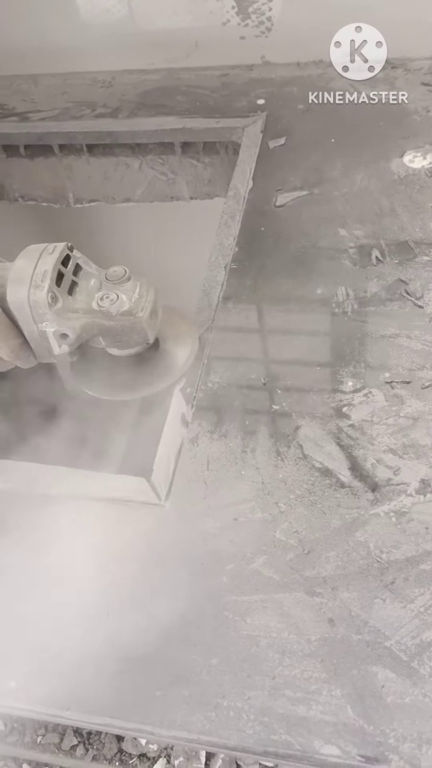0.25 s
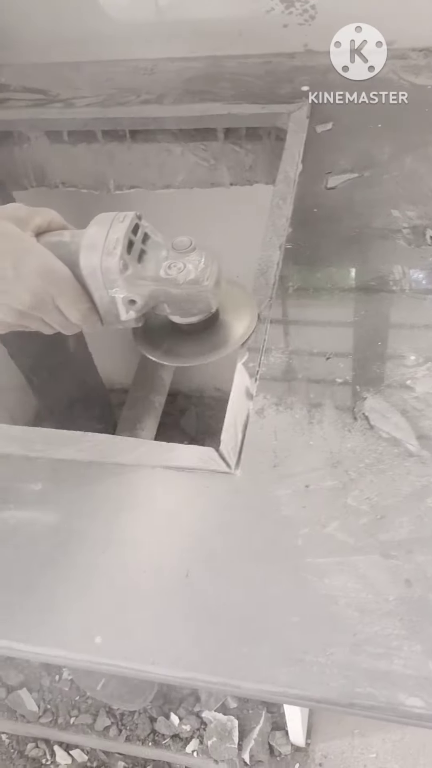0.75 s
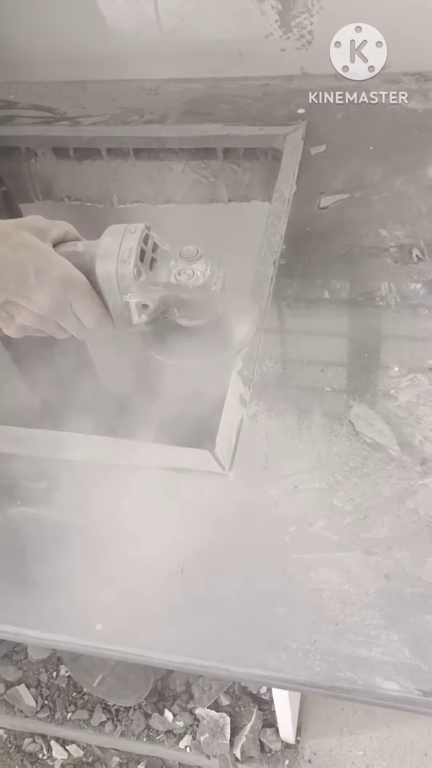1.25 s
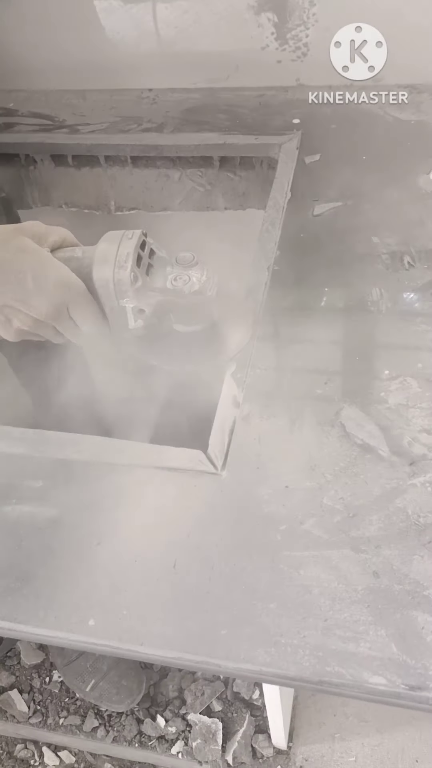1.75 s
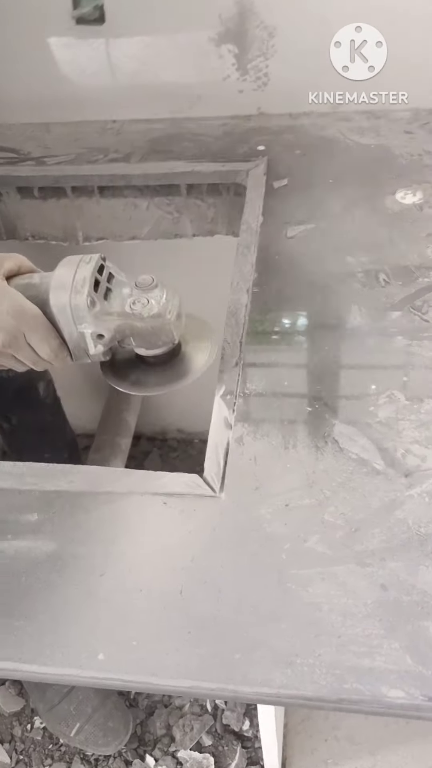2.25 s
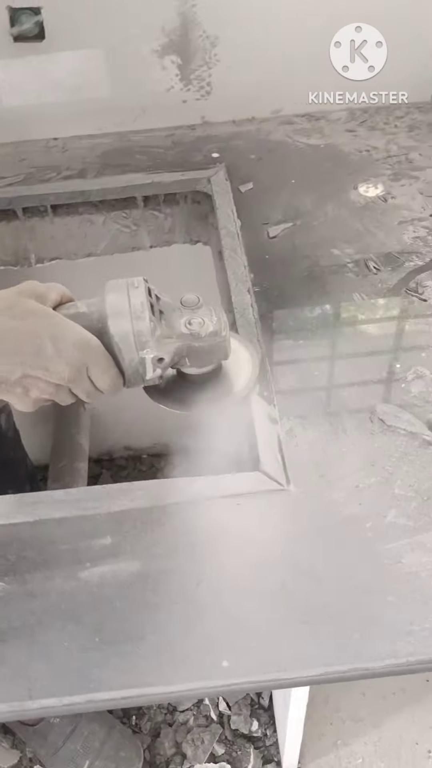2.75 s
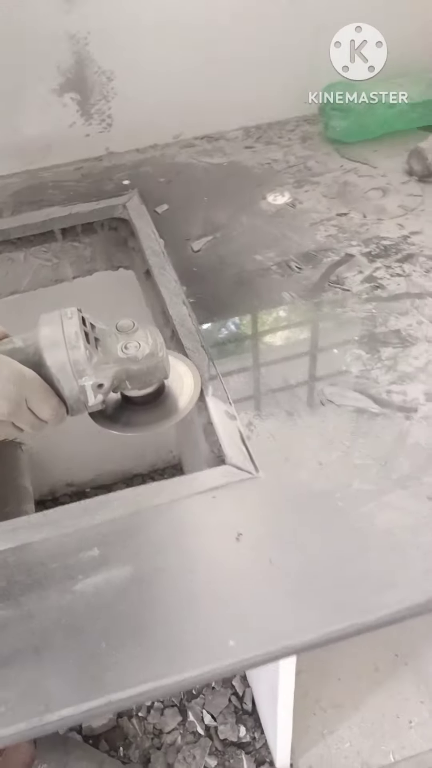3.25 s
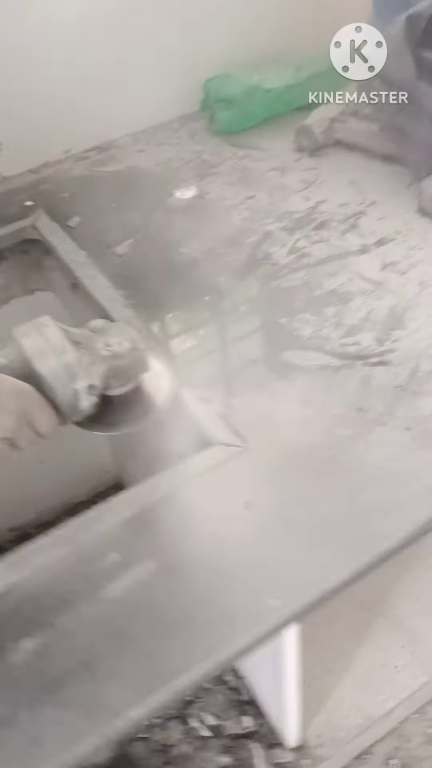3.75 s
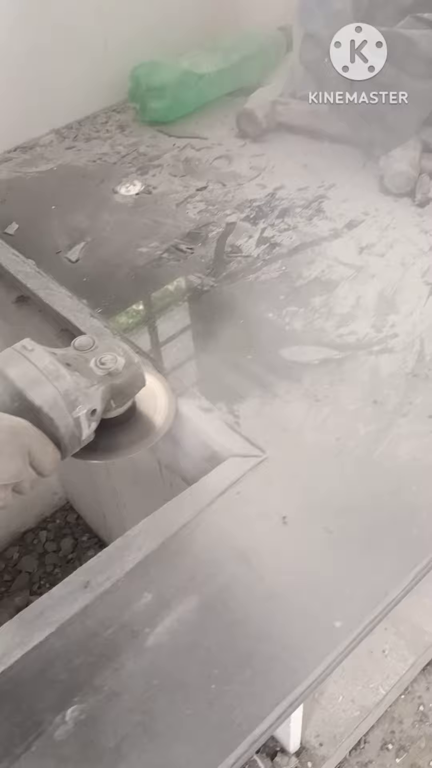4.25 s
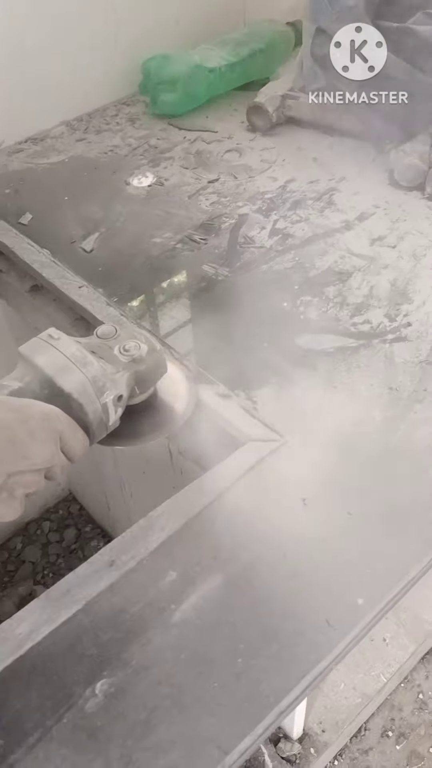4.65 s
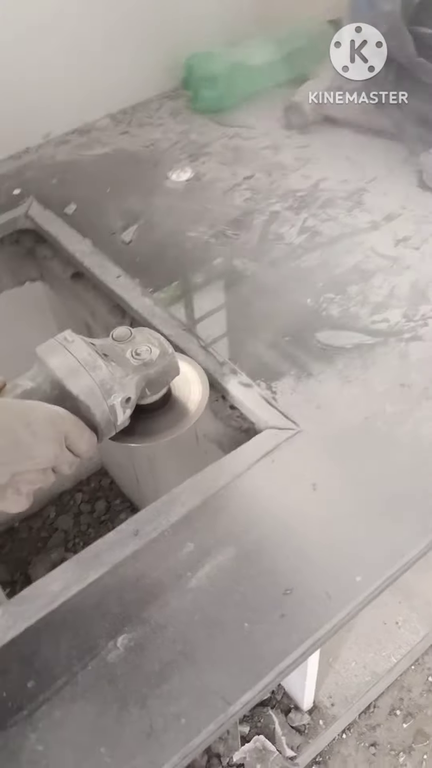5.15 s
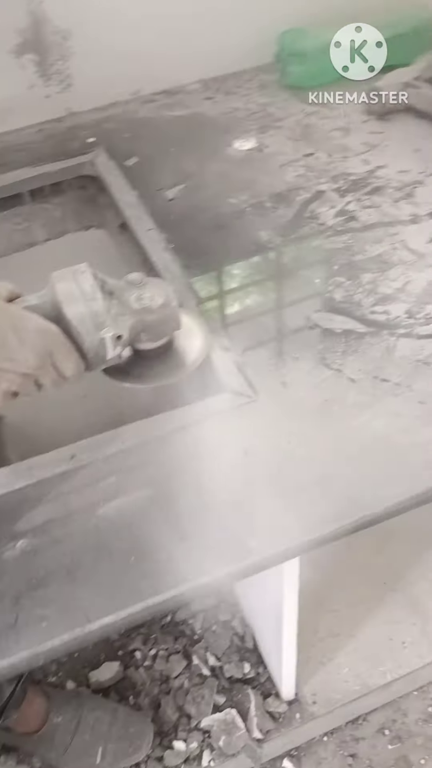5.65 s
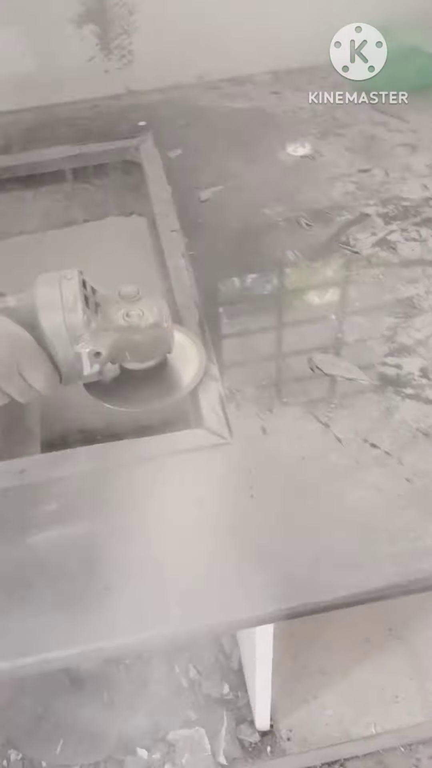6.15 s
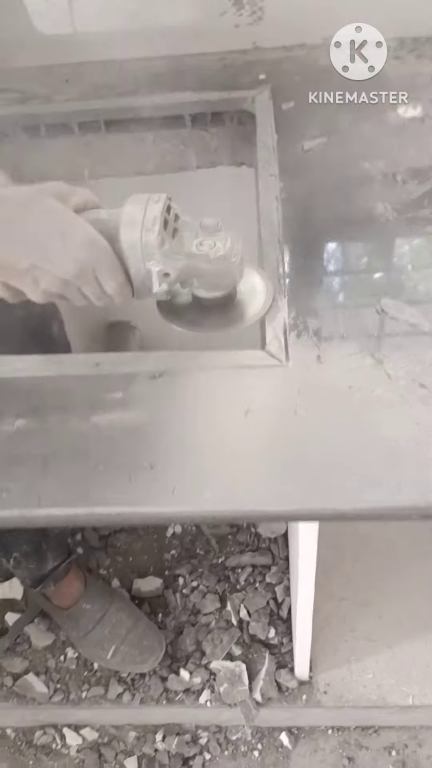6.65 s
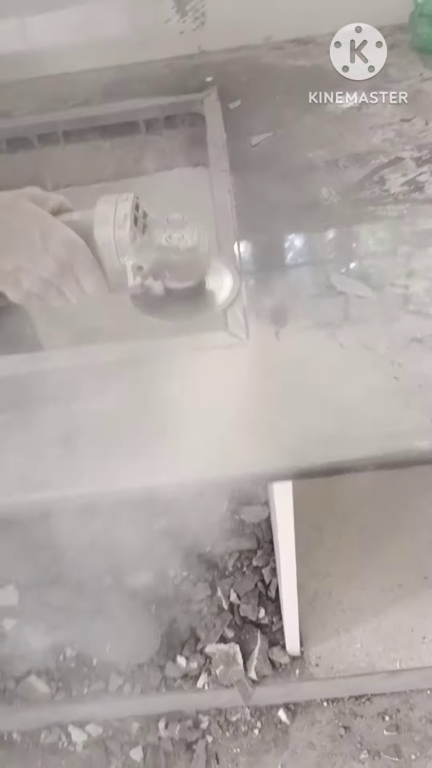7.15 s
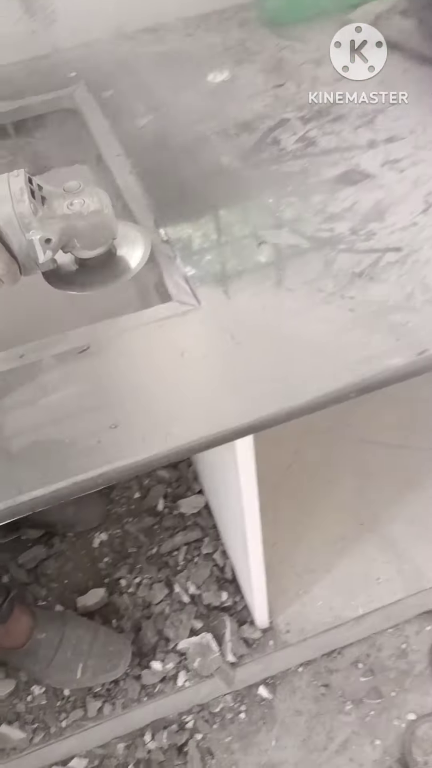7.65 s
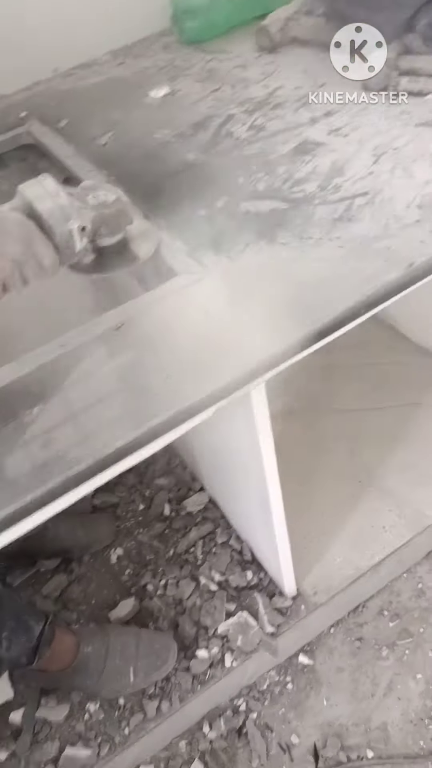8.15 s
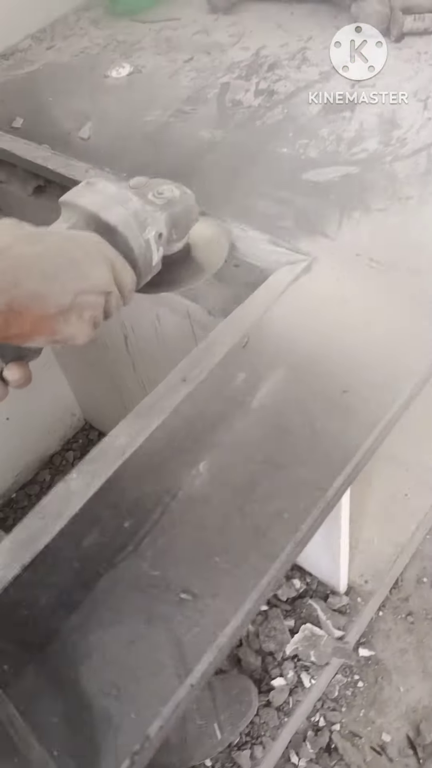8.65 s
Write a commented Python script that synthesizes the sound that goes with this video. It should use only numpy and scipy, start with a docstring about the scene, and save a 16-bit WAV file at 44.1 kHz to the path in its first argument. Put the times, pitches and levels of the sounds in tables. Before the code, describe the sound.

In a bare room, a steel grinding disc rasps and rings against stone in seven close passes of uneven length. Each time the angle grinder lifts, the grinding briefly stops and its hissing motor spins up, only to drop in pitch at the next touch. A low rush of air hits the nearby microphone during the passes, pushing the overall level down.

```python
"""First comes the rasp of grit and a ringing steel disc: an angle grinder is already on the stone.
It dresses a countertop edge in seven passes, in a bare room, close to a stereo microphone.
Under load the rotor slows; lifted, it spins up, whining while its fan hisses. The dusty draught
off the cut buffets the microphone, whose gain control ducks and recovers."""
import sys
import numpy as np
from scipy import signal
from scipy.fft import rfft, irfft, next_fast_len
from scipy.io import wavfile
from scipy.ndimage import uniform_filter1d

SR = 44100
rng = np.random.default_rng(int(sys.argv[2]) if len(sys.argv) > 2 else 0)


def pcm_store(signal):
    """Save signal as 16-bit PCM."""
    levels = np.round(np.clip(np.atleast_2d(signal), -1, 1) * 32767)
    wavfile.write(sys.argv[1], SR, levels.astype(np.int16).T)


N = 392490
TIME = np.arange(N) / SR


# Grit on the stone edge, heard close: (frequency [Hz], relative level [dB])
RASP_SPECTRUM = [(200, -11.5), (700, 3), (1200, 1.5), (2400, -1), (3700, 3.5), (5200, 1), (6000, 1),
                 (7500, -2), (9500, -7), (12400, -9.5), (13600, -0.5), (14200, -7), (14600, -12),
                 (15400, -2)]
# Its place across the microphone: (frequency [Hz], left minus right [dB])
RASP_BALANCE = [(500, 8.5), (1300, -0.5), (2400, -4), (4000, -3), (7000, -4.5), (9300, -15), (11000, -4.5),
                (12500, -17.5), (14000, 14.5), (15000, -14.5)]

def stone_rasp(turns):
    """Grains breaking off the stone rasp louder the harder the hand presses."""
    grains = grit(turns, grains_per_s=26000, spread_db=2.0, wobble=0.025, flutter_db=0.64)
    force = pressure(press_share=0.88, landing_db=-20, settle_s=0.016)
    return amp(-25.0) * colour(grains, RASP_SPECTRUM, RASP_BALANCE) * force


# Modes of the steel disc, at the microphone:
# (frequency [Hz], width [Hz], level [dB], left minus right [dB], swell per unit of freshness [dB])
DISC_MODES = [(4724, 180, -40.5, -1, -5), (5056, 170, -44.5, 1, 3.5), (6620, 430, -40, 4, 1),
              (8334, 100, -47, 9, 2), (10350, 59, -51, -9, 3), (11610, 97, -42.5, -6, 3.5),
              (13020, 190, -42, -2, 8), (13200, 250, -50, 5, -2), (15500, 150, -49, 2, -5)]

def disc_ring(turns):
    """Grains set the disc ringing; each mode comes and goes as the contact point moves."""
    grains = grit(turns, grains_per_s=18000, spread_db=3.5, wobble=0.068, flutter_db=1.0)
    force = pressure(press_share=0.39, landing_db=-2, settle_s=0.012)
    drive = grains * np.maximum(force, amp(1.5) * lag(force, seconds=0.032))  # sings on after the lift
    # the lighter the disc lands, the more its ring changes at first
    freshness = sum(.72 * amp(-.8 * first_db) * (TIME > touch) * np.exp(-abs(TIME - touch) / 0.11)
                    for touch, *_, first_db, _ in PASSES)
    ring = 0
    for hz, width_hz, db, side_db, fresh_db in DISC_MODES:
        mode = signal.lfilter(*signal.iirpeak(hz, hz / width_hz, SR), drive)
        swell_db = fresh_db * freshness + wander(15.0)
        ring = ring + amp(db + swell_db) * pair(side_db)[:, None] * unit(mode)
    return ring


def grit(turns, grains_per_s, spread_db, wobble, flutter_db):
    """Countless grains break off, louder at the high spot of each turn of the disc."""
    sizes = amp(spread_db * np.minimum(rng.exponential(1, (2, N)), 4))
    grains = sizes * rng.standard_normal((2, N)) * (rng.random((2, N)) < grains_per_s / SR)
    disc_turns = .27 * turns  # geared down from the rotor
    return unit(grains) * (1 + wobble * np.cos(2 * np.pi * disc_turns)) * amp(flutter_db * wander(22))


# Passes along the countertop: (touch [s], lift [s], press of the hand [dB],
# swing of the vents towards the microphone [dB], firmness of first touch [dB], draught fade [s])
PASSES = [(-.6, .393, 0.37, 6.5, -9, 0.011), (.745, 2.133, 0, 4.5, -1.5, 0.011),
          (2.474, 2.967, -1.5, -2.5, -5.5, 0.009), (3.344, 5.13, .5, 5, -4.5, 0.16),
          (5.471, 6.354, 0, 2, -7.5, .01), (6.697, 7.439, -1.2, .3, -3, 0.011),
          (7.852, 8.679, -.5, 1.5, -4.5, .023)]

def pressure(press_share, landing_db, settle_s, bite_db=1.85, ease_s=0.018):
    """Force on the stone: the disc bites deeper through each pass and eases just before the lift."""
    force = 0
    for touch, lift, press_db, *_ in PASSES:
        press = amp(press_share * press_db + bite_db * (progress(touch, lift) - .5))
        release = np.clip((lift - TIME) / ease_s, 0, 1)
        force = force + press * lean(touch, landing_db, settle_s) * release
    return force


def lean(touch, landing_db, settle_s):
    """The disc touches lightly, then the hand leans in."""
    age = np.maximum(TIME - touch, 0)
    return np.minimum(age / 0.023, 1) * amp(landing_db * np.exp(-age / settle_s))


def rotor_speed(free_hz, sag_hz, inertia_s):
    """The rotor sags in step with the press and spins up again when the disc is lifted."""
    load = sum(amp(press_db) * (TIME > touch) * (TIME < lift) for touch, lift, press_db, *_ in PASSES)
    return lag(free_hz - sag_hz * load, inertia_s) * (1 + 0.0011 * wander(25))


# Hiss from the fan vents, heard close: (frequency [Hz], relative level [dB])
FAN_SPECTRUM = [(300, -46), (600, -20.5), (850, -8.5), (1200, -10), (1700, -6.5), (2500, -13), (3300, -2),
                (4100, 2.5), (5400, -3.5), (6700, -1.5), (8200, -3.5), (10500, 0), (13000, -5.8),
                (14200, -11.5), (15400, -14.5)]
# Its place across the microphone: (frequency [Hz], left minus right [dB])
FAN_BALANCE = [(60, 0.5), (99, 1.0), (160, 0.0), (270, 0.0), (450, 5), (740, -4.5), (1220, 0.5),
               (2010, 2.5), (3330, 3.5), (5500, 5), (9080, -4), (15000, -7)]

def fan_hiss(turns):
    """Air is chopped once a turn; on each pass the arm swings the vents to or from the microphone."""
    air = rng.standard_normal((2, N)) * (1 + .07 * np.cos(2 * np.pi * turns))
    arches_db = sum(swing_db * np.sin(np.pi * progress(touch, lift))
                    for touch, lift, _, swing_db, *_ in PASSES)
    return amp(-34.5 + lag(arches_db, seconds=0.14)) * colour(air, FAN_SPECTRUM, FAN_BALANCE)


# Whine at the microphone: (multiple of rotor speed [ratio], level at free speed [dB])
# .54 is twice the disc's turn, 24 the commutator
WHINE_TONES = [(.54, -68), (.66, -79), (1.46, -72), (2, -62), (3.33, -64), (4, -55.5), (4.88, -65),
               (8, -58), (8.7, -52), (10, -58), (24, -55)]
# Tones that sing out at the microphone as the tool is turned:
# (time [s], multiple of rotor speed [ratio], boost [dB], half length [s])
WHINE_FLARES = [(.66, 4, 5, .09), (.72, 8.7, 7, .04), (2.355, 8.7, 12, .045), (3.27, .66, 10, .08),
                (5.44, .66, 15, .05), (6.65, 2, 4, .06), (7.72, 2, 4, .12), (8.86, .66, 11, .06)]

def motor_whine(turns):
    """Rotor and gears sound tones locked to the speed; slack in gears and bearings shakes the phase."""
    whine = 0
    for multiple, db in WHINE_TONES:
        flare_db = sum(boost_db * np.exp(-((TIME - at) / half_s) ** 2)
                       for at, tone, boost_db, half_s in WHINE_FLARES if tone == multiple)
        slack = .25 * wander(45)
        offset = min(multiple / 2, 1) * rng.random((2, 1))  # low tones are more in step left and right
        wave = np.sqrt(2) * np.cos(2 * np.pi * (multiple * turns + offset) + slack)
        whine = whine + amp(db + flare_db + 2 * wander(16.0)) * wave
    return whine


# Draught right on the microphone, at full flow: (frequency [Hz], relative level [dB])
DRAUGHT_SPECTRUM = [(20, -39), (40, -5.5), (70, -2.5), (140, -1), (240, 2.5), (430, -2), (700, 0.5),
                    (900, -4.5), (1200, -13), (2000, -18), (5000, -43)]
# Place of draught and housing rush across the microphone: (frequency [Hz], left minus right [dB])
AIR_BALANCE = [(60, 3.5), (200, 3.5), (400, 2), (700, 0.1), (1300, -7.5)]

def draught(level_db, patchy_db, gust_db):
    """Dusty air off the cut hits each microphone port on its own; its eddies sink in pitch as it dies."""
    force, flow = np.zeros(N), np.zeros(N)
    for touch, lift, press_db, _, first_db, fade_s in PASSES:
        remaining = np.clip(1 - (TIME - lift) / fade_s, 0, 1) * (TIME > touch - .02)
        flow += remaining ** 3
        force += amp(0.31 * press_db) * lean(touch, first_db, settle_s=0.091) * np.sqrt(remaining)
    hz, frame_s, eddies = signal.stft(rng.standard_normal((2, N)), SR, nperseg=1024, noverlap=768)
    full_flow_hz = hz[:, None] / np.clip(np.interp(frame_s, TIME, flow), .35, 1)
    patches = uniform_filter1d(rng.standard_normal(eddies.shape), size=8, axis=1)
    patches = unit(uniform_filter1d(patches, size=4, axis=2))
    eddies *= amp(read(DRAUGHT_SPECTRUM, full_flow_hz) + patchy_db * patches)
    eddies *= pair(read(AIR_BALANCE, hz))[:, :, None]
    buffet = unit(signal.istft(eddies, SR, nperseg=1024, noverlap=768)[1][:, :N])
    return amp(level_db + gust_db * wander(85)) * force * buffet


# Air in the housing, faint even close by: (frequency [Hz], relative level [dB])
RUSH_SPECTRUM = [(20, -24), (60, -13), (110, -14), (190, -6), (330, -5.5), (480, 4), (700, 1.5),
                 (1500, -12.5)]

def housing_rush():
    """Air flows through the housing with a low rush."""
    return amp(-57.5) * colour(rng.standard_normal((2, N)), RUSH_SPECTRUM, AIR_BALANCE)


def room(x, t60_s, wet_db, patterns=5):
    """Bare walls add a short diffuse tail; its pattern keeps changing as tool and microphone move."""
    age = TIME[:SR // 3]
    shares = np.array([wander(5.0) for _ in range(patterns)])
    shares /= np.linalg.norm(shares, axis=0)
    wet = 0
    for share in shares:
        tail = rng.standard_normal((2, len(age))) * amp(-60 * age / t60_s) * (age > .004)
        tail /= np.linalg.norm(tail, axis=1, keepdims=True)
        wet = wet + signal.oaconvolve(x * share, tail, axes=1)[:, :N]
    return (x + amp(wet_db) * wet) / np.hypot(1, amp(wet_db))


def gain_control(x, limit_db, ratio, recover_db_per_s, attack_s):
    """Power of the lows above the limit pulls the gain down quickly; it creeps back afterwards."""
    lows = signal.sosfilt(signal.butter(2, 1500, fs=SR, output="sos"), x)
    level_db = 10 * np.log10(abs(uniform_filter1d((lows ** 2).mean(0), size=1400)) + 1e-12)
    duck_db = lag(np.maximum(level_db - limit_db, 0) * (1 - 1 / ratio), attack_s)
    climb_db = TIME * recover_db_per_s
    return x * amp(climb_db - np.maximum.accumulate(duck_db + climb_db))


def amp(db):
    """Decibels to gain."""
    return 10 ** (np.asarray(db) / 20)


def unit(x):
    """Scales to rms 1."""
    return x / np.sqrt(np.mean(x ** 2) + 1e-20)


def read(points, hz):
    """Reads a spectrum on a log-frequency axis."""
    point_hz, db = np.transpose(points)
    return np.interp(np.log(hz + 1), np.log(point_hz + 1), db)


def pair(side_db):
    """Left and right gains for a balance."""
    return amp(np.array([side_db, -side_db]) / 2)


def colour(x, spectrum, balance):
    """Gives a stereo signal a spectrum and a balance, at rms 1."""
    size = next_fast_len(N, True)
    hz = np.fft.rfftfreq(size, 1 / SR)
    gains = amp(read(spectrum, hz)) * pair(read(balance, hz))
    return unit(irfft(rfft(x, size) * gains, size)[:, :N])


def wander(rate_hz, size=8192):
    """Random drift of rms 1, mostly slower than the rate."""
    grid = np.linspace(0, TIME[-1], size)
    hz = np.fft.rfftfreq(size, grid[1])
    drift = irfft(rfft(rng.standard_normal(size)) / (1 + (hz / rate_hz) ** 2))
    return np.interp(TIME, grid, unit(drift))


def lag(x, seconds):
    """Follows x with inertia."""
    keep = np.exp(-1 / (seconds * SR))
    return x[0] + signal.lfilter([1 - keep], [1, -keep], x - x[0])


def progress(touch, lift):
    """Runs from 0 to 1 over a pass."""
    return np.clip((TIME - touch) / (lift - touch), 0, 1)


def scene():
    """Grinder and stone in the bare room, near enough for the draught to reach the microphone."""
    free_hz = 508  # rotor speed with no load
    speed = rotor_speed(free_hz, sag_hz=55.3, inertia_s=.38)
    turns = np.cumsum(speed) / SR
    motor = (fan_hiss(turns) + housing_rush() + motor_whine(turns)) * (speed / free_hz) ** 2.46
    tool = motor + stone_rasp(turns) + disc_ring(turns)
    return room(tool, t60_s=0.17, wet_db=-8.5) + draught(level_db=-32.5, patchy_db=0.1, gust_db=0.94)


def record(dry):
    """The microphone's gain control, then a steep cut of the highest treble."""
    ducked = gain_control(dry, limit_db=-48, ratio=3.15, recover_db_per_s=40.0, attack_s=0.019)
    lowpass = signal.firwin(1023, cutoff=15500, window=("kaiser", 9), fs=SR)
    return signal.oaconvolve(ducked, lowpass[None], "same")


dry = scene()
out = record(dry)
pcm_store(out)
```